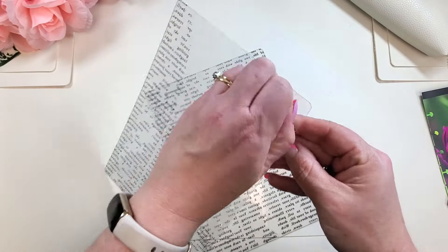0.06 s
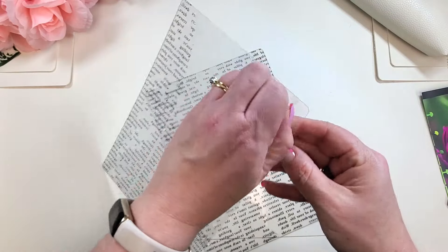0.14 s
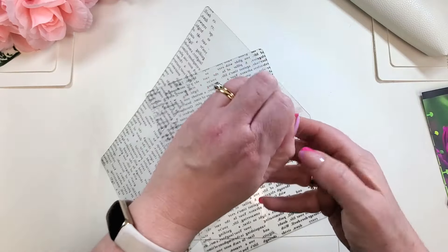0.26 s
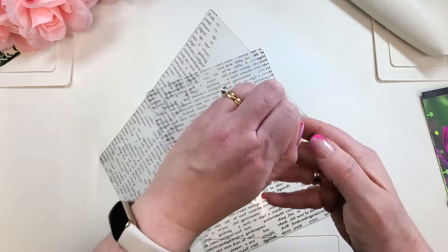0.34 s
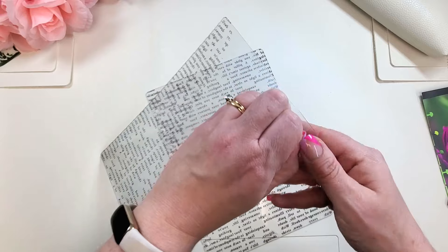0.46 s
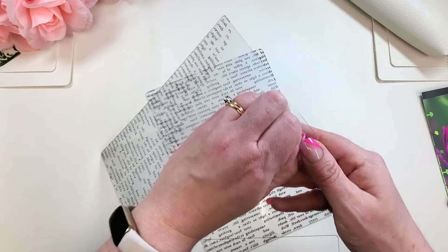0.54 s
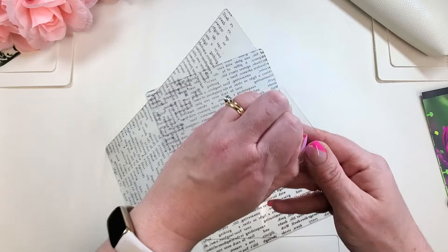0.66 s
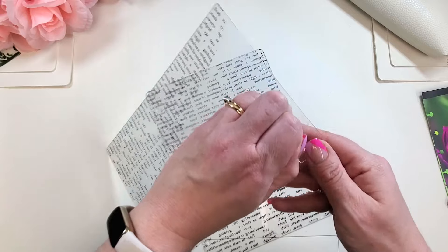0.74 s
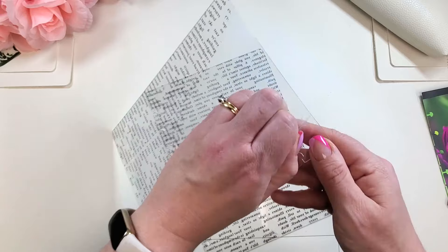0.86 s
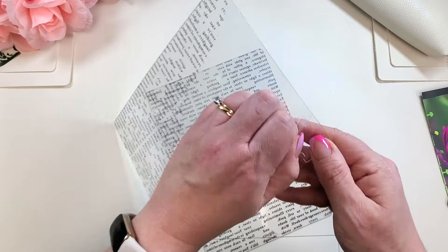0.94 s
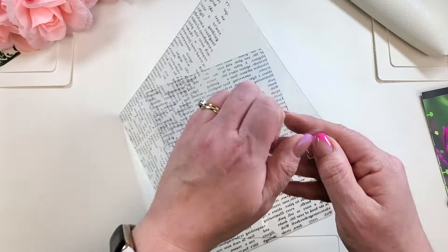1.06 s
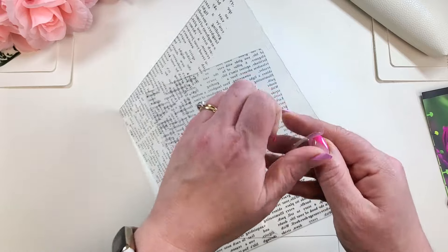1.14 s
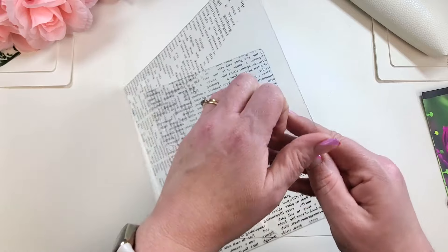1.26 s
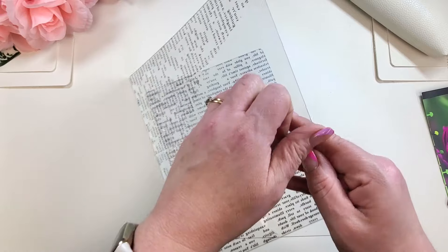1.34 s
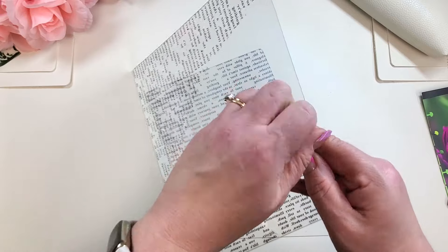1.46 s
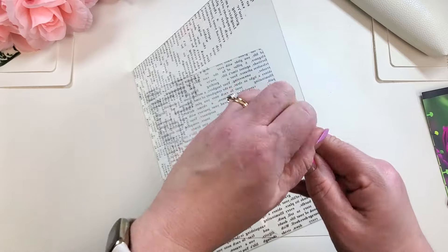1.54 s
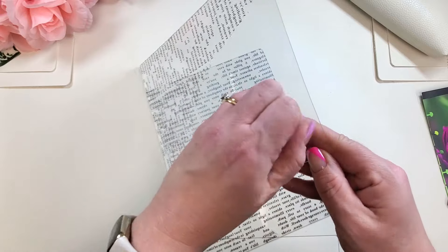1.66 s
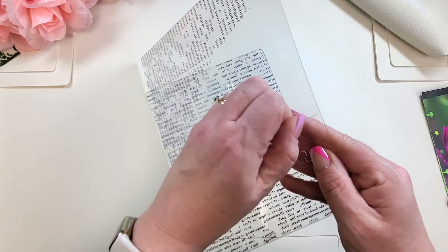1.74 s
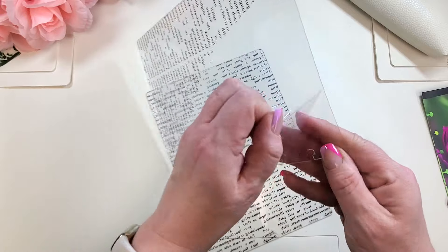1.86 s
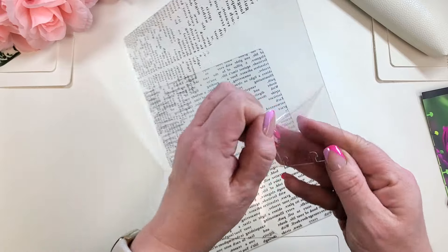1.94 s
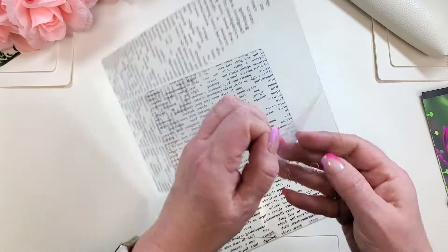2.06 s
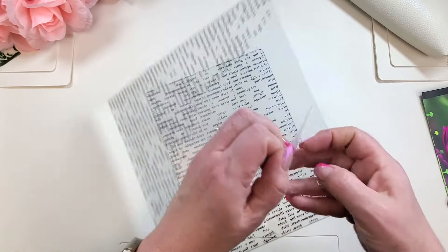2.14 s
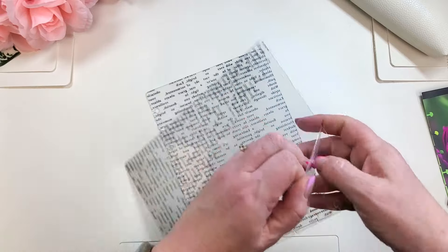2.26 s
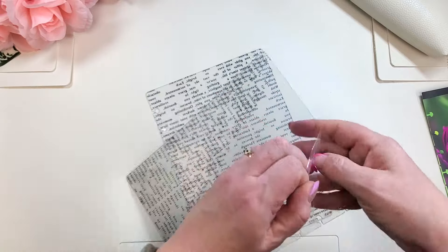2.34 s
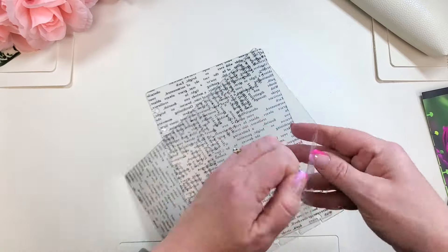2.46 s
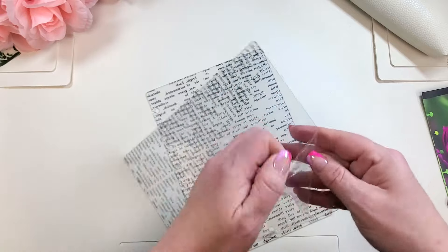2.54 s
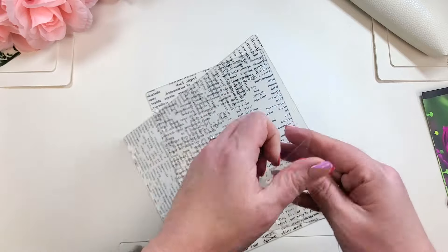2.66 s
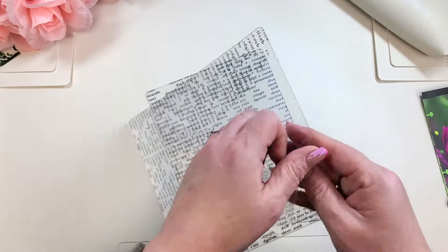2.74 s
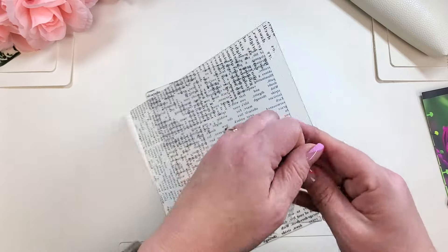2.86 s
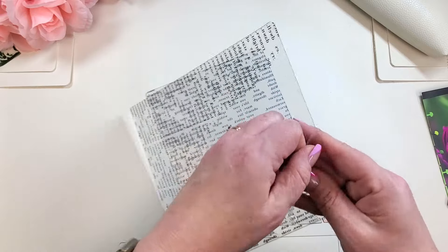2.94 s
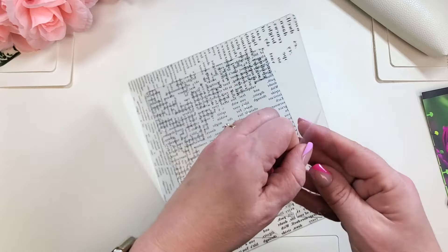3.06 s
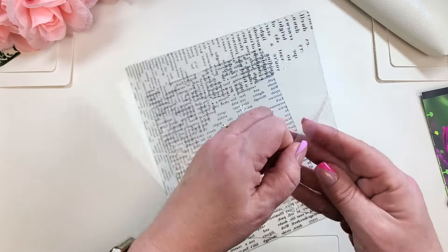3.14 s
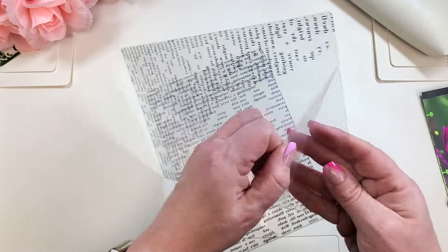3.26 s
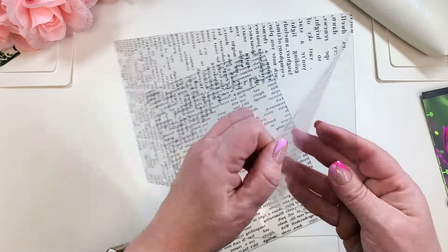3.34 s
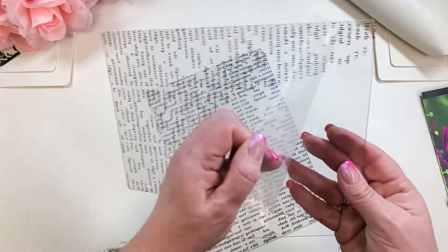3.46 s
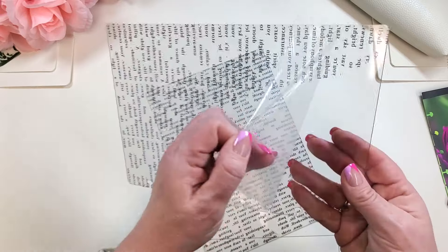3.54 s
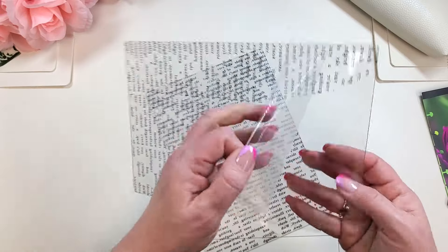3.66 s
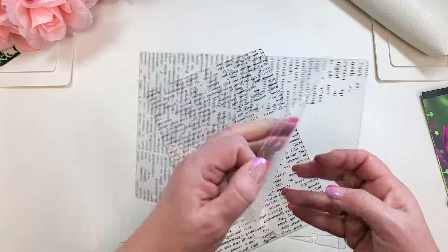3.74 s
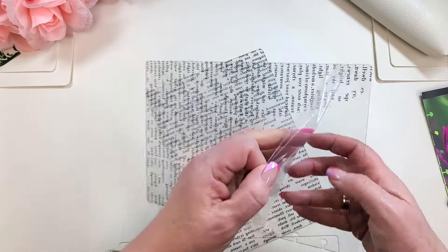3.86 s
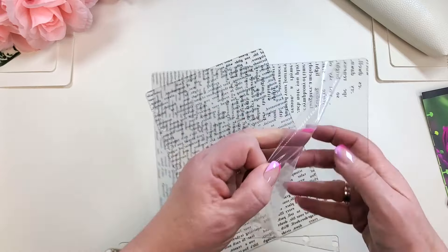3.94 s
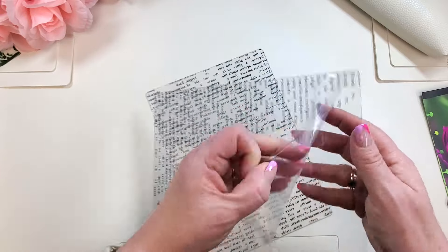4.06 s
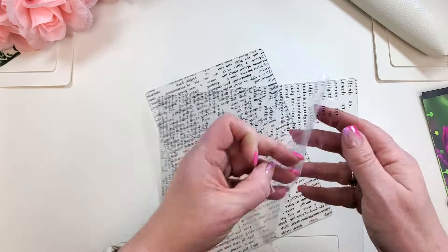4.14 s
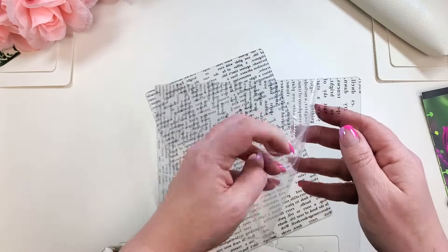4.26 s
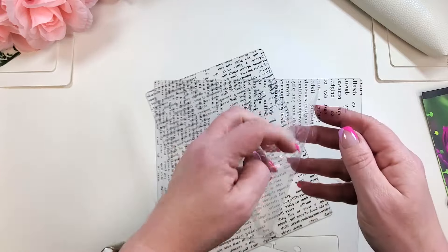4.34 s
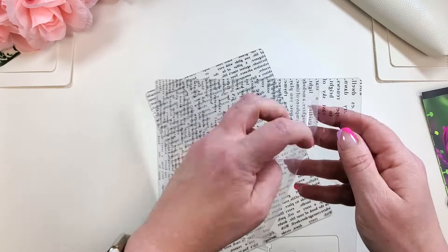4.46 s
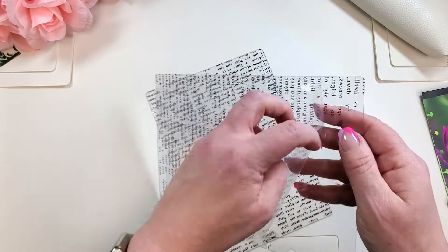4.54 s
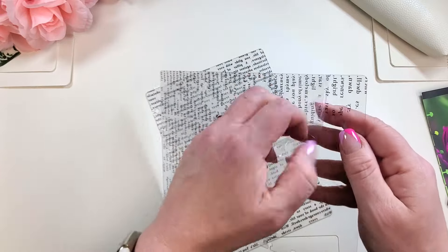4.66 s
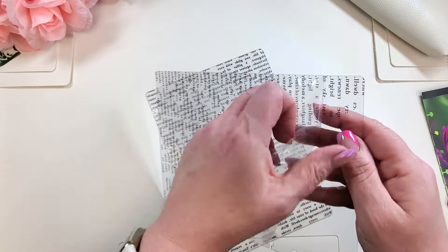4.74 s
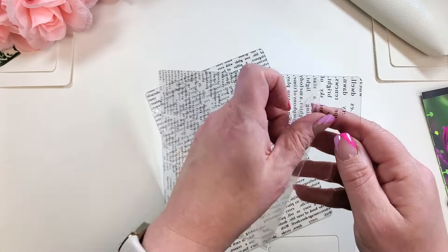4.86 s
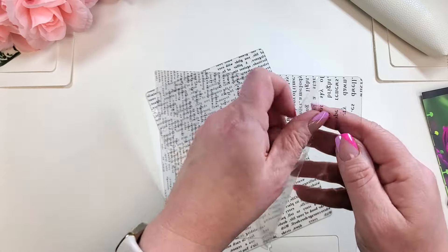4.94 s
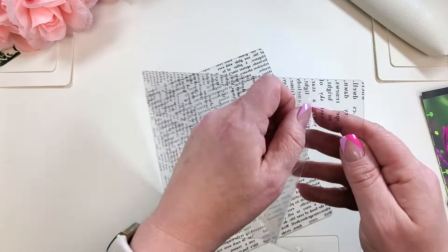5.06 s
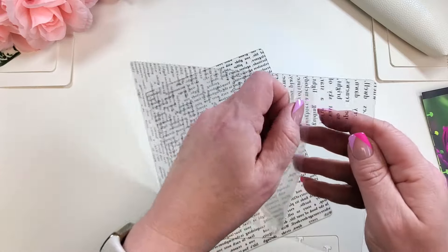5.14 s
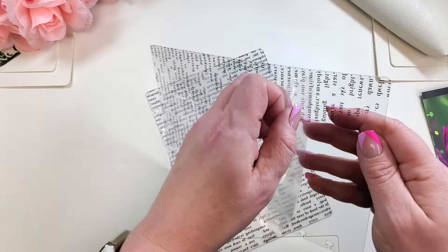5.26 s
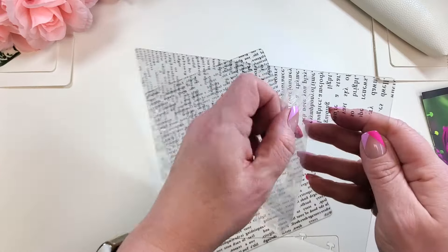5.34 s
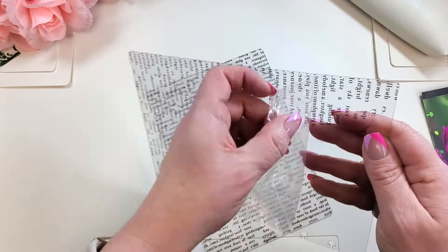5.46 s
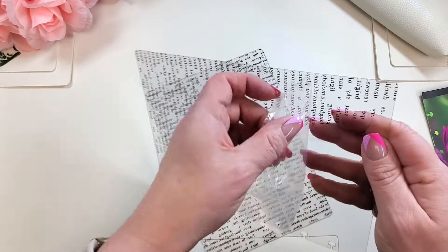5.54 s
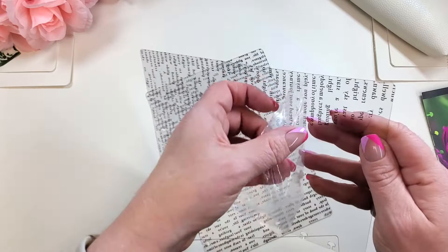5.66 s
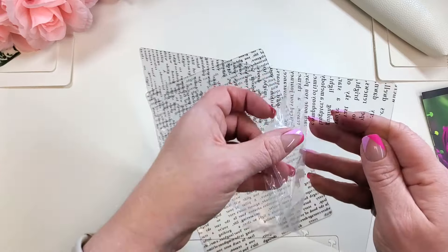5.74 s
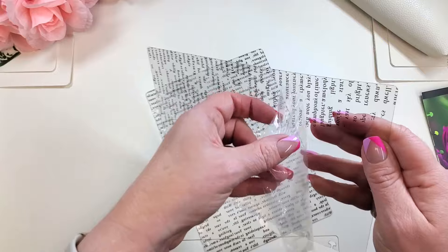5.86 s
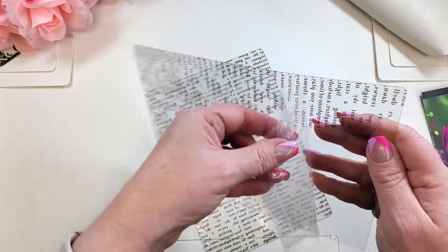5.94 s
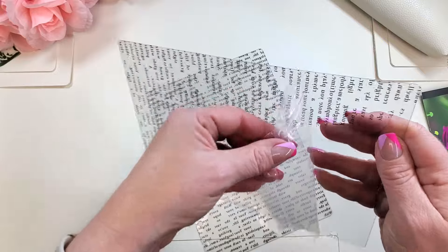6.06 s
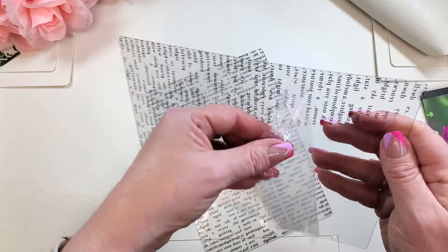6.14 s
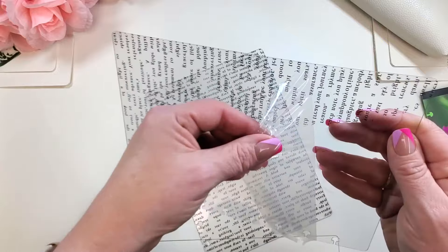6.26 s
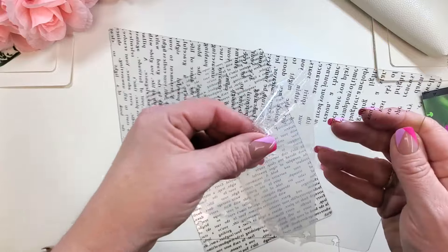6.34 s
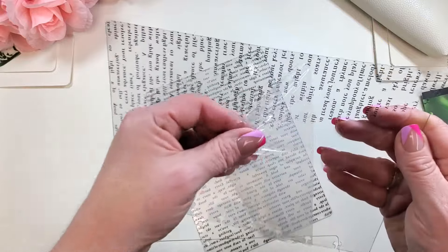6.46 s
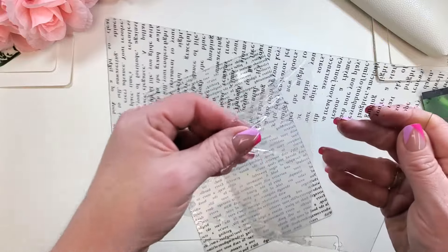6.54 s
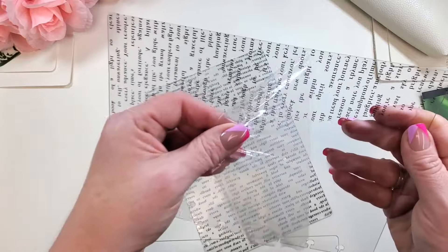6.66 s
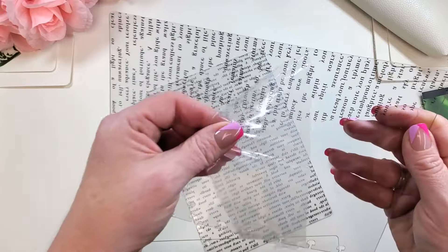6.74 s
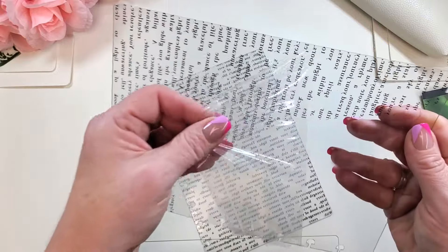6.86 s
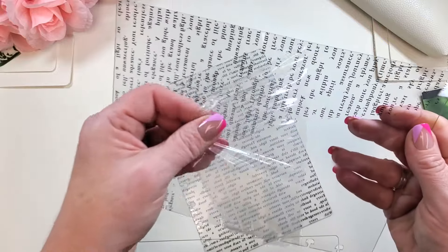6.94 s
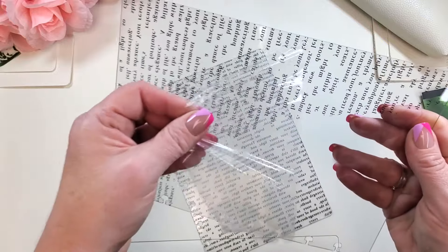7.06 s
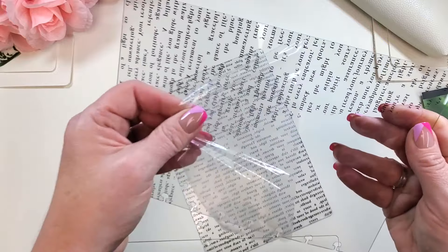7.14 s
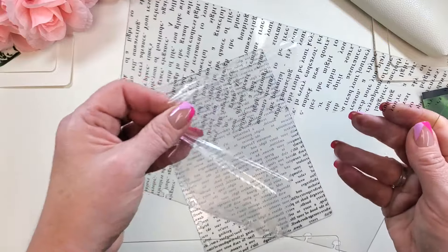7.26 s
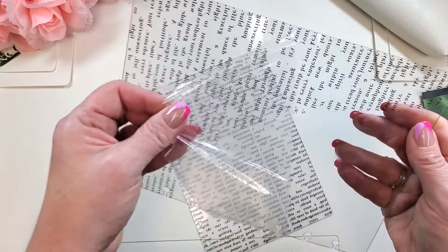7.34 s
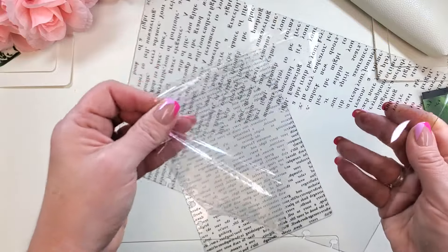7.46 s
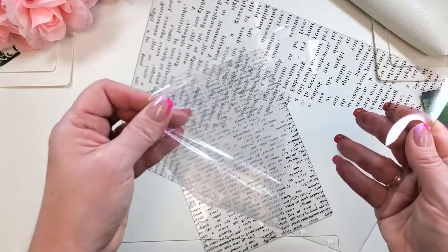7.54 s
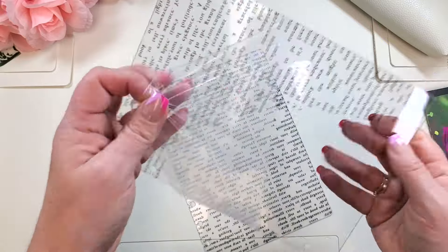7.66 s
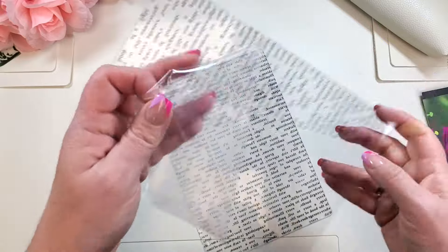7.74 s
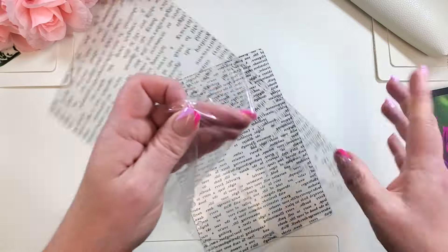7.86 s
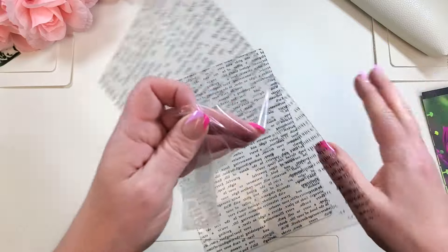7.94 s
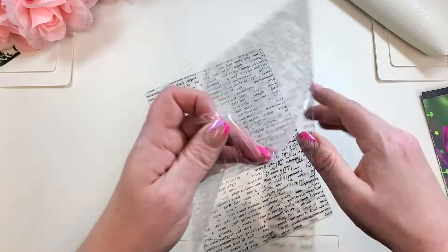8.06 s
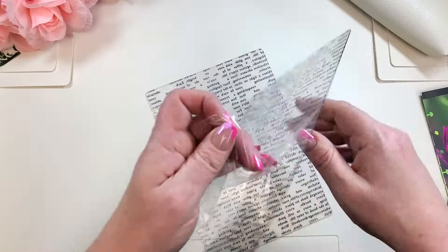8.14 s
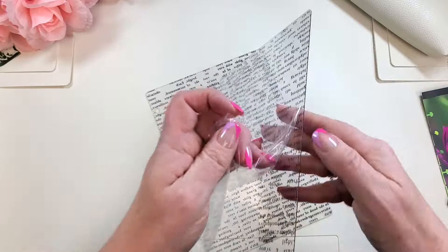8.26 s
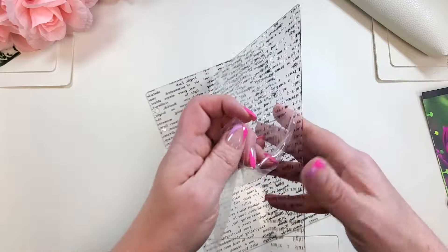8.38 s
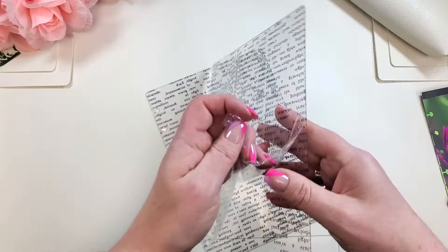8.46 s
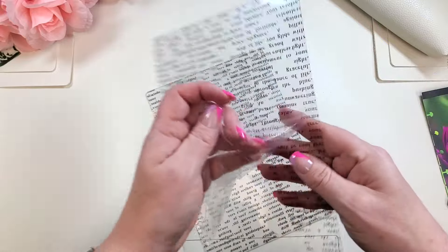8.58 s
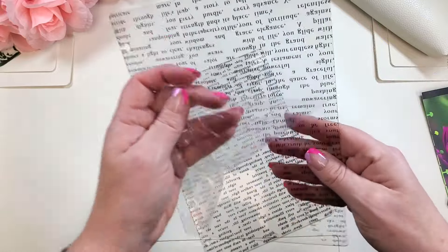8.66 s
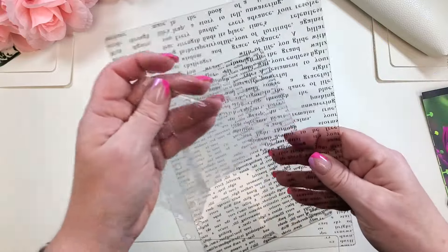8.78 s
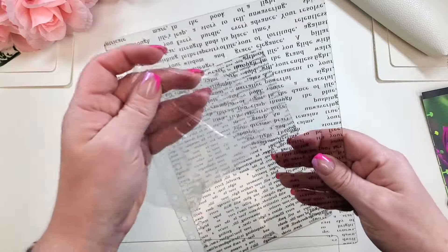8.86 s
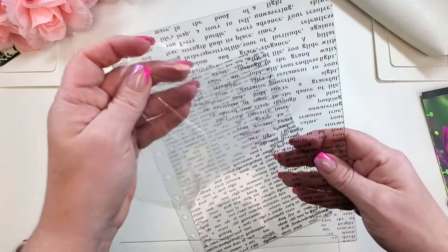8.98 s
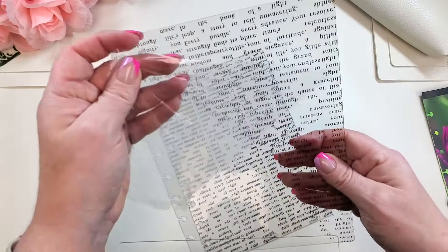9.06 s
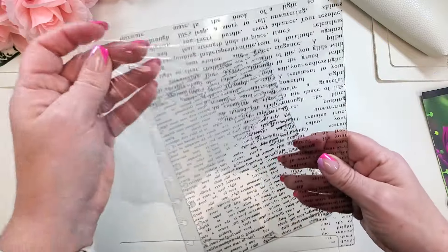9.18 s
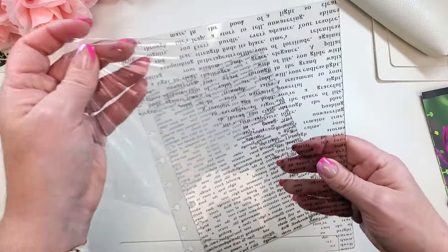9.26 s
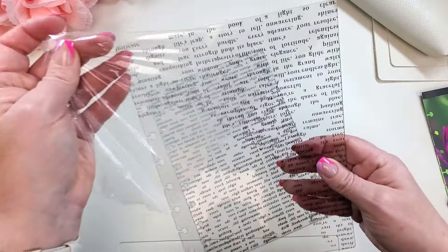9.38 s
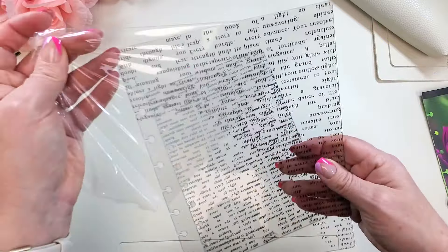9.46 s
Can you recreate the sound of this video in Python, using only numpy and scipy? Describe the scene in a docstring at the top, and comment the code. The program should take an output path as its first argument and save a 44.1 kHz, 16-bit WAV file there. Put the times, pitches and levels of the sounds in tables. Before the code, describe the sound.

Close and dry over a desk in a quiet room with faint low rumble, plastic film is peeled from a stiff clear sheet. A few crisp snaps come at 0.1 s, then near quiet, and a small cluster of clicks around 0.95 s. At about 1.4 s an edge rubs the desk with a brief hollow whistle. From 1.7 to 2.1 s loud, zipping rips crack out in quick rows. Faint rustle follows until 3.1 s, when stronger rips run to 3.7 s, the sheet ringing dully. Light crinkling lasts through 4 to 5 s, with a buzzing rip at 5.15-5.4 s. Fine crackle thickens from 6.5 s, with sharp pops through 7.7 s and a busy, crumpling rustle around 8 s. From 8.6 s the snaps and rips turn fuller and more resonant, with low wobbling puffs of the sheet, continuing to the end near 9.5 s.

```python
"""Sharp snaps over a quiet room's rumble: clinging film is peeled in jerks off a stiff clear sheet.
The sheet is held over a desk, close under a phone. Each slip of the peel line kicks filtered noise:
the film cracks in the treble and the sheet rings in its modes. Rips are rows of nearly even slips.
Between snaps, random creases rustle, the sheet drags and whistles on the desk, and low puffs sound
as it swings through the air."""
import sys
import numpy as np
from scipy import signal
from scipy.fft import rfft, irfft
from scipy.io import wavfile
from scipy.ndimage import uniform_filter1d

SR = 44100
rng = np.random.default_rng(int(sys.argv[2]) if len(sys.argv) > 2 else 0)


def dump(signal):
    """Clip the signal to [-1, 1] and save it as 16-bit WAV at the path in sys.argv[1]."""
    limited = np.clip(np.atleast_2d(signal).T, -1, 1)
    pcm = np.round(limited * 32767).astype(np.int16)
    wavfile.write(sys.argv[1], SR, pcm)


def ratio(d):
    """dB to gain"""
    e = np.asarray(d, float) / 20
    return 10 ** e


N = 419302

# room rumble spectrum, relative: hz, level_db_per_hz
ROOM_SPECTRUM = [(15, -62), (25, -25), (42, -1), (65, 5.5), (141, -26.5), (232, -22), (279, -10.5),
                 (400, -43.5), (520, -64.5), (880, -120)]
ROOM_DB = -58.5

# low wobble of the sheet swung through the air: time_s, level_db
SWING = [(0.0, -67.5), (1.38, -61.5), (1.46, -42), (1.61, -68), (1.8, -47.5), (2.59, -68), (2.67, -50),
         (2.96, -67), (3.6, -39.5), (3.84, -71.5), (4.53, -55.5), (5.08, -67), (5.35, -38.5), (5.4, -52),
         (5.93, -66.5), (7.36, -47.5), (7.55, -61), (7.68, -40), (7.84, -59), (7.89, -49), (8.18, -58),
         (8.26, -40.5), (8.55, -61), (8.87, -31.5), (9.03, -49), (9.14, -31), (9.19, -50), (9.27, -27.5),
         (9.37, -51), (9.51, -36)]

# whistle of an edge sliding on the desk: time_s, low_whistle_db, high_whistle_db
SLIDE = [(.54, -84.5, -81), (.62, -77, -75), (.85, -81, -68), (1.08, -85, -87), (1.2, -68, -72),
         (1.42, -39, -53), (1.66, -66, -72), (1.72, -104.5, -91)]
# its two resonances: hz, width_hz, level_db
SLIDE_LOW_MODES = [(684, 67, 0)]
SLIDE_HIGH_MODES = [(1750, 210, 0)]

# sheet resonances, relative: hz, width_hz, level_db
SHEET_LOW_MODES = [(182, 99, -0.5), (330, 56, 3.5), (420, 49, -0.5), (622.7, 129, 1), (924, 92, 1.5),
                   (1199, 290, 1)]
SHEET_HIGH_MODES = [(2244, 1250, -6), (2507, 359, 1.5), (2860, 1080, -9.5)]
# low-mode pitch favoured by how the sheet is gripped and bent: time_s, pitch_hz
FAVOURED_PITCH = [(0, 483), (1.0, 904), (1.58, 549), (1.82, 935), (2.1, 620), (2.33, 384), (3.2, 700),
                  (3.55, 479), (4.6, 728), (5.36, 680), (6.1, 463), (6.66, 660), (6.9, 364), (7.68, 700),
                  (8.25, 330), (8.7, 800), (8.92, 444), (9.12, 610), (9.22, 1040)]
FOCUS_DB_PER_OCTAVE2 = 4.5  # loss of a mode per squared octave from the favoured pitch
# film spectrum, relative: hz, level_db_per_hz
FILM_SPECTRUM = [(2060, -17), (3500, -9.5), (5270, -2.5), (5690, -4.5), (8140, 3.5), (11000, 3.5),
                 (12800, 0), (15400, -13.5), (16100, -28.5), (16500, -17.5)]

# hand moves between snaps: start_s, end_s, film_rustle_db, sheet_drag_db
HAND_MOVES = [(0, .1, -60, -54.5), (.11, .16, -54, -52), (.2, .35, -70, -68), (.42, .45, -74, -65.5),
              (.85, .89, -50, -52.5), (.95, 1.02, -42.5, -51.5), (1.13, 1.25, -65, -53),
              (1.35, 1.55, -62.5, -47.5), (1.55, 1.66, -64, -58), (2.17, 2.28, -66.5, -70),
              (2.31, 2.36, -53.5, -44), (2.37, 2.55, -62.5, -54.5), (2.6, 2.74, -59, -52.5),
              (2.75, 2.82, -70, -70), (2.84, 3.08, -61.5, -63.5), (3.74, 3.9, -55.5, -59),
              (3.93, 4.16, -68.5, -66.5), (4.17, 4.31, -49.5, -46.5), (4.37, 4.5, -43.5, -46),
              (4.5, 4.67, -52, -47), (4.69, 4.76, -43, -44), (4.77, 4.84, -50.5, -51),
              (4.87, 4.96, -78, -73), (4.98, 5.15, -49.5, -55), (5.4, 5.5, -47.5, -47),
              (5.51, 5.66, -44.5, -52), (5.68, 5.85, -54, -55.5), (5.89, 6.07, -57, -67.5),
              (6.08, 6.12, -64, -50.5), (6.13, 6.2, -61, -58.5), (6.2, 6.48, -51.5, -61),
              (6.55, 6.61, -43, -57), (6.63, 6.77, -44, -54), (6.8, 6.89, -43, -47.5),
              (6.93, 7.0, -43, -39), (7.0, 7.28, -45.5, -82), (7.33, 7.4, -50, -50),
              (7.46, 7.53, -53.5, -54.5), (7.58, 7.66, -44.5, -51), (7.67, 7.73, -39, -37),
              (7.73, 7.8, -46, -47), (7.85, 7.99, -43, -45), (8.0, 8.06, -38, -45), (8.08, 8.19, -47, -47),
              (8.23, 8.3, -40.5, -40), (8.3, 8.43, -38, -41), (8.56, 8.72, -37, -42.5),
              (8.85, 9.03, -34, -36), (9.14, 9.2, -37, -46), (9.28, 9.33, -37, -34),
              (9.4, 9.51, -42.5, -51)]
RISE_DB_PER_S, FALL_DB_PER_S = 698.5, 403
REST_FILM_DB, REST_DRAG_DB = -85, -78.5  # hands at rest
RIP_LAG_S = 0.015  # rustle sets in after the first slip
RIP_FILM_DB, RIP_DRAG_DB = -21.5, -13  # rustle a rip drags along, over its slips
HIGH_FOLLOWS_LOW, HIGH_DRAG_DB = 0.6, 3  # high-mode drag: share of the way from film to low, offset

# lone slips of the peel line and creases, before layer gains:
# time_s, crack_db, low_ring_over_crack_db, high_ring_over_crack_db
LONE_SLIPS = [(0.0804, -37, -27, -28), (0.102, -31.5, -35.5, -47), (0.112, -17, -26, -29),
              (0.1207, -13.5, -25, -25), (0.124, -8.5, -19.5, -23.5), (0.1731, -7.5, -59.5, -61),
              (0.4145, -52, -4, 1), (0.7739, -25.5, -48, -28), (0.8435, -13, -47, -18.5),
              (0.9353, -12, -35, -20), (0.9527, -13, -26.5, -13.5), (0.9609, -12, -19.5, -6),
              (0.973, -15, -33, -22), (0.98, -6.5, -28, -15.5), (1.0027, -16, -36, -5.5),
              (1.0061, -15, -21.5, -11), (1.4548, -25.5, -6, -3.5), (1.5775, -23.5, -35, -38),
              (1.5973, -29, -38, -34), (1.6841, -14, -49, -43), (1.8128, -2.5, -17.5, -24.5),
              (1.8328, -0.5, -31, -21), (1.8528, -17.5, -5.5, -7), (1.8672, -0.5, -21, -22),
              (1.8886, -4, -22.5, -20), (2.0443, -8, -5.5, -11), (2.071, -2, -17.5, -14),
              (2.1381, -29, -29, -27), (2.3109, -36.5, -22, 5.5), (2.5095, -45, -12, -4),
              (2.577, -34.5, -33, -23), (2.6623, -27.5, -2, -2.5), (2.679, -33, 1, 5.5),
              (2.717, -39.5, -3, 0), (3.1009, -40, -15.5, -11), (3.1353, -12, -19, -16),
              (3.2926, 0, -17.5, -14), (3.3129, 0, -11, -12), (3.3353, -4, -11, -11), (3.7968, -64, 25, 16),
              (3.8841, -39.5, 4.5, -3), (4.1918, -36, -19, 0), (4.277, -29, -7.5, -5),
              (4.384, -28.5, -28, -7), (4.43, -19, -23, -10), (4.456, -29, -30, -15),
              (4.4928, -25.5, -17, -12.5), (4.6927, -29, -6, -7.5), (4.7315, -21, -21, -11),
              (4.7766, -27, -25, -33), (4.8287, -25, -12, -8), (5.0269, -23, -20, -20.5),
              (5.0627, -21, -24, -19), (5.0917, -14, -23, -20.5), (5.1028, -8, -41, -20),
              (5.1165, -13, -28, -30), (5.1358, -14, -53, -33), (5.4152, -22, -29, -12),
              (5.4338, -18.5, -18, -15), (5.4478, -22, -19, -11), (5.521, -16.5, -24, -15.5),
              (5.5389, -10, -20, -13.5), (5.5599, -25, -28, -10), (5.5827, -19, -28, -15),
              (5.5957, -19.5, -33, -12), (5.6441, -19.5, -34, -10.5), (5.673, -37, -20, 0),
              (5.696, -35, -20, -8), (5.8112, -27.5, -31, -22), (5.912, -28.5, -15.5, -10),
              (5.969, -46, 3.5, -2.5), (6.008, -27, -12, -13), (6.0293, -30.5, -19, -9.5),
              (6.1731, -30.5, -4, -8), (6.2168, -18, -17.5, -10), (6.2348, -19, -18, -15),
              (6.2774, -43, -29, -1), (6.345, -25.5, -17.5, -16.5), (6.4327, -26.5, -16, -9.5),
              (6.4492, -23.5, -21, -12), (6.509, -28.5, -45, -19), (6.5423, -22, -48.5, -17),
              (6.5524, -17, -17, -9), (6.5871, -19, -25, -7), (6.5946, -20.5, -34, -13.5),
              (6.6366, -15.5, -36, -22), (6.652, -16.5, -22, -15), (6.663, -22, -33, -25),
              (6.6734, -21, -24, -18), (6.6867, -13.5, -18, -15.5), (6.7013, -16, -13, -5.5),
              (6.709, -11, -12.5, -13.5), (6.7312, -14, -40, -13), (6.7461, -17.5, -13.5, -24),
              (6.76, -13.5, -9.5, -12.5), (6.8048, -17.5, -33, -12), (6.8299, -15.5, -34.5, -10),
              (6.8454, -11, -13, -18), (6.8691, -6, -14, -15.5), (6.9217, -24.5, -27, -17),
              (6.9418, -17.5, -19, -15), (6.9558, -9, -14, -20.5), (6.988, -15.5, -39, -30),
              (7.0335, -21.5, -37, -21), (7.0583, -27, -37, -15), (7.0719, -15, -41, -15.5),
              (7.114, -9.5, -31, -17), (7.1448, -9.5, -20.5, -19), (7.1676, -15, -20, -13),
              (7.1759, -13, -31, -15), (7.1913, -18.5, -25, -17), (7.224, -7.5, -17.5, -19.5),
              (7.2442, -12, -20.5, -15.5), (7.277, -19.5, -35, -19), (7.3749, -12, -8, -14),
              (7.47, -26.5, -12, -15), (7.4884, -22, -18, -14), (7.5657, -14.5, -37, -22),
              (7.5971, -16.5, -32, -15), (7.6203, -7.5, -11.5, -14.5), (7.64, -15, -12, -14),
              (7.674, -3.5, -11, -14.5), (7.6893, -4.5, -10.5, -11), (7.7735, -20.5, -21, -14),
              (7.857, -37, -21, 0), (7.9349, -25.5, -3, -7), (7.9741, -13, -34, -27),
              (8.0034, -21.5, -3, -11), (8.0173, -7, -16.5, -14.5), (8.0379, -12.5, -23, -12.5),
              (8.103, -15.5, -27, -23), (8.152, -19, -13, -28), (8.1731, -17, -41, -26),
              (8.2399, -23.5, 0, -18), (8.2658, -18.5, -13.5, -17), (8.3079, -20.5, -4.5, -9),
              (8.3483, -32, -28, -30), (8.3907, -12.5, -13, -16), (8.4195, -19, -24, -33),
              (8.54, -24, -38, -27), (8.5662, -16, -31, -25), (8.6243, -9, -13.5, -20),
              (8.6354, -6, -21, -20), (8.6567, -3.5, -19, -20.5), (8.6757, -6.5, -13, -16.5),
              (8.6844, -11.5, -8, -9), (8.6984, -6, -17, -16), (8.7192, -16.5, -6, -6),
              (8.8658, -8.5, -4, -10.5), (8.8833, -14.5, -6, -6.5), (8.9069, -17.5, -2.5, -14),
              (8.9213, -14.5, -8, -5.5), (8.937, -12, -24, -15.5), (8.964, -13.5, -27, -22),
              (8.979, -10, -7.5, -21), (8.9934, -20, -22, -3), (9.1566, -15, -28, -32),
              (9.2069, -9, -20, -22.5), (9.2913, -7, -11, -17.5), (9.3082, -10.5, 3, -24),
              (9.4006, -19, -14, -22), (9.408, -12, 2, -31), (9.437, -10, -26, -27),
              (9.4464, -16, -18, -17)]
# rips, peel line slipping at a nearly even pace, before layer gains:
# first_s, last_s, slips_per_s, first_db, last_db, low_ring_over_crack_db, high_ring_over_crack_db
RIPS = [(1.694, 1.784, 92.5, -18.5, -7, -32.5, -20.5), (1.905, 1.927, 100, -4, 1, -14.5, -9.5),
        (1.952, 1.969, 150, -3, -8.5, -13.5, -12), (1.99, 2.025, 143, -8.5, -10, -12.5, -11),
        (2.091, 2.117, 75.6, -4, -11.5, -12.5, -12), (3.147, 3.182, 190, -8, -8.5, -15.5, -11.5),
        (3.201, 3.223, 86.8, -2.5, -4, -11, -16.5), (3.234, 3.26, 140.6, -4.5, -8.5, -9.5, -12.5),
        (3.379, 3.463, 115, -2.5, -5.5, -10, -7.5), (3.483, 3.53, 72.5, -7, -10, -5, -6),
        (3.5388, 3.58, 142, -4.5, -7.5, -8.5, -6.5), (3.591, 3.684, 140, -0.5, -14, -8, -11.5),
        (5.158, 5.279, 117, -13, -6, -22.5, -16), (5.296, 5.376, 125, -6.5, -5.5, -11, -17),
        (7.295, 7.326, 100, -22.5, -5, -17, -20.5), (8.738, 8.848, 115, -7, -3, -14, -16),
        (9.034, 9.066, 160, -17.5, -9.5, -14, -15), (9.085, 9.138, 68, -6, -14.5, -6, -11.5),
        (9.2243, 9.282, 110, -5, -10.5, 0, -9.5), (9.455, 9.474, 91.5, -14, -10.5, 0.5, -13.5)]

CRACK_DECAY_S, PUSH_DECAY_S = 0.0014, 0.002  # amplitude e-fold; the heavy sheet feels a longer push
DESK_T60_S, DESK_DB = 0.055, -7.5
WALLS_T60_S, WALLS_DB = 0.12, -29
WIDTH_DB = -25.5
TOP_HZ = 15900


def curve(time_s, values):
    """Straight lines between points in time."""
    return np.interp(np.arange(N) / SR, time_s, values)


def unit(x):
    """Scale to rms 1."""
    return x / np.sqrt(np.mean(x ** 2))


def colour(x, points):
    """Causal minimum-phase filter through (hz, db) points, of unit power for white noise."""
    hz, db = np.transpose(points)
    grid_hz = np.maximum(np.fft.rfftfreq(4096, 1 / SR), 1)
    gain_db = np.interp(np.log(grid_hz), np.log(hz), db)
    cepstrum = irfft(np.log(ratio(gain_db)))
    cepstrum[1:2048] *= 2  # fold onto positive time
    cepstrum[2049:] = 0
    response = irfft(np.exp(rfft(cepstrum)))
    return signal.oaconvolve(x, response / np.sqrt(np.sum(response ** 2)))[:N]


def ring(x, modes, favoured_hz=None):
    """Resonances of alternating sign; those far from the favoured pitch are weaker."""
    hz, width_hz, db = (column[:, None] for column in np.transpose(modes))
    if favoured_hz is not None:
        db = db - FOCUS_DB_PER_OCTAVE2 * np.log2(hz / favoured_hz) ** 2
    power = np.sum(ratio(db) ** 2 * width_hz, axis=0) * np.pi / SR
    drive = x * ratio(db) / np.sqrt(power)
    out = np.zeros(N)
    for k in range(len(modes)):
        b, a = signal.iirpeak(hz[k, 0], hz[k, 0] / width_hz[k, 0], SR)
        out += (-1) ** k * signal.lfilter(b, a, drive[k])
    return out


def bursts(strikes, decay_s):
    """Each strike starts a decaying noise burst; overlapping bursts add in power."""
    power = signal.lfilter([1], [1, -np.exp(-2 / (decay_s * SR))], strikes ** 2)
    return rng.standard_normal(N) * np.sqrt(power)


def room():
    """Steady noise in the spectrum of a quiet room's rumble."""
    return ratio(ROOM_DB) * colour(rng.standard_normal(N), ROOM_SPECTRUM)


def flap():
    """Soft low puffs as the sheet wobbles: band-passed noise under the swing curve."""
    band = signal.butter(2, [55, 190], "band", fs=SR, output="sos")
    puffs = signal.sosfilt(band, rng.standard_normal(N))
    time_s, level_db = np.transpose(SWING)
    return ratio(curve(time_s, level_db)) * unit(puffs)


def slide():
    """Edge on desk: the same friction noise drives two narrow resonances."""
    time_s, low_db, high_db = np.transpose(SLIDE)
    friction = rng.standard_normal(N)
    low = ring(ratio(curve(time_s, low_db)) * friction, SLIDE_LOW_MODES)
    high = ring(ratio(curve(time_s, high_db)) * friction, SLIDE_HIGH_MODES)
    return low + high


def tear(strikes, decay_s, kick=5.98):
    """A sharp kick, the tearing after it, and scattered echoes of desk and walls."""
    t60_per_decay = np.log(1000)
    desk = ratio(DESK_DB) * bursts(strikes, DESK_T60_S / t60_per_decay)
    walls = ratio(WALLS_DB) * bursts(strikes, WALLS_T60_S / t60_per_decay)
    return kick * strikes + bursts(strikes, decay_s) + desk + walls


def plastic(crack, low, high):
    """Film sounds in the treble, sheet in two mode groups; the low group radiates no treble."""
    low_ring = ring(low, SHEET_LOW_MODES, curve(*np.transpose(FAVOURED_PITCH)))
    low_ring = signal.sosfilt(signal.butter(2, 1700, fs=SR, output="sos"), low_ring)
    return colour(crack, FILM_SPECTRUM) + low_ring + ring(high, SHEET_HIGH_MODES)


def handling():
    """Film rustle and sheet drag levels (dB): each move and rip swells, holds and dies away."""
    moves = list(HAND_MOVES)
    for first_s, last_s, _, first_db, last_db, low_rel_db, _ in RIPS:
        mean_db = (first_db + last_db) / 2
        moves.append((first_s + RIP_LAG_S, last_s, mean_db + RIP_FILM_DB,
                      mean_db + low_rel_db + RIP_DRAG_DB))
    t = np.arange(0, N / SR, 0.002)
    start_s, end_s, film_db, drag_db = np.transpose(moves)[:, :, None]
    rise_db = -RISE_DB_PER_S * np.maximum(start_s - t, 0)
    fall_db = -FALL_DB_PER_S * np.maximum(t - end_s, 0)

    def loudest(db, rest_db):
        """The loudest move at each moment, never below rest."""
        return curve(t, np.maximum(np.max(db + rise_db + fall_db, axis=0), rest_db))

    return loudest(film_db, REST_FILM_DB), loudest(drag_db, REST_DRAG_DB)


def rustle(pops_per_s=500, spread_db=2.5, colour_db=4.5, hiss=0.4, rub=0.9, surge_db=2.5, surge_s=0.03):
    """Random crease pops, few big and many tiny, each in its own colour, over hiss and low rub."""
    film_db, low_db = handling()
    high_db = film_db + HIGH_FOLLOWS_LOW * (low_db - film_db) + HIGH_DRAG_DB
    chance = rng.random((2, N))
    pops = (chance[0] < pops_per_s / SR) * ratio(-spread_db * np.log(1 - chance[1]))
    span = int(surge_s * SR)
    wander = uniform_filter1d(uniform_filter1d(rng.standard_normal(N), span), span)
    surge = ratio(surge_db * unit(wander))

    def grain(db, decay_s, noise=hiss):
        """The pops as one part of the plastic feels them, in uneven surges."""
        share = ratio(colour_db * rng.standard_normal(N))
        texture = unit(tear(pops * share, decay_s)) + noise * rng.standard_normal(N)
        return ratio(db) * unit(surge * texture)

    return plastic(grain(film_db, CRACK_DECAY_S), grain(low_db, PUSH_DECAY_S, rub),
                   grain(high_db, CRACK_DECAY_S))


def rips(uneven=0.1, scatter_db=1.7, lean_db=2.2, break_db=3.0, swell_db=4.0):
    """Rows like LONE_SLIPS: the first breaks harder, low ring swells, pace and size stumble."""
    rows = []
    for first_s, last_s, slips_per_s, first_db, last_db, low_rel_db, high_rel_db in RIPS:
        along = np.linspace(0, 1, round((last_s - first_s) * slips_per_s) + 1)
        chance = rng.standard_normal((4, 32))[:, :len(along)]
        inner = along % 1 > 0  # first and last slip keep their times
        time_s = first_s + (last_s - first_s) * along + uneven / slips_per_s * chance[0] * inner
        crack_db = first_db + (last_db - first_db) * along
        crack_db = crack_db + scatter_db * chance[1] + break_db * (along == 0)
        low_db = low_rel_db + swell_db * (along - 0.5) + lean_db * chance[2]
        high_db = high_rel_db + lean_db * chance[3]
        rows.append([time_s, crack_db, low_db, high_db])
    return np.hstack(rows)


def snaps(film_gain_db=-9.5, low_gain_db=0.0, high_gain_db=5.5):
    """Each slip's tear excites film and sheet, every snap in its own balance."""
    slips = np.hstack([np.transpose(LONE_SLIPS), rips()])
    time_s, crack_db, low_rel_db, high_rel_db = slips
    at = np.minimum((time_s * SR).astype(int), N - 1)

    def strikes(db):
        """One impulse per slip."""
        return np.bincount(at, ratio(db), N)

    return plastic(tear(strikes(crack_db + film_gain_db), CRACK_DECAY_S),
                   tear(strikes(crack_db + low_rel_db + low_gain_db), PUSH_DECAY_S),
                   tear(strikes(crack_db + high_rel_db + high_gain_db), CRACK_DECAY_S))


def flicker(hold_s=0.026, share=0.4):
    """Short moments in which the image wavers off centre; otherwise left equals right."""
    hold = int(hold_s * SR)
    gate = np.repeat(rng.random(N // 200) < share, hold)[:N]
    waver = uniform_filter1d(rng.standard_normal(N), size=150)
    return ratio(WIDTH_DB) * unit(waver) * uniform_filter1d(1.0 * gate, size=300)


def scene():
    """All sources close under the phone, near the centre."""
    mid = room() + flap() + slide() + rustle() + snaps()
    side = mid * flicker()
    return np.array([mid + side, mid - side])


def roll_off(x):
    """The treble ends steeply here."""
    return signal.sosfilt(signal.butter(12, 16650, fs=SR, output="sos"), x)


def record(dry):
    """The phone rounds the loudest peaks and cuts the top."""
    rounded = dry / (1 + dry ** 4) ** 0.25
    lowpass = signal.ellip(8, 0.2, 70, TOP_HZ, fs=SR, output="sos")  # ripple, stopband in dB
    cut = signal.sosfilt(lowpass, rounded)
    return roll_off(np.clip(cut, -1, 1))


dry = scene()
out = record(dry)
dump(out)
```